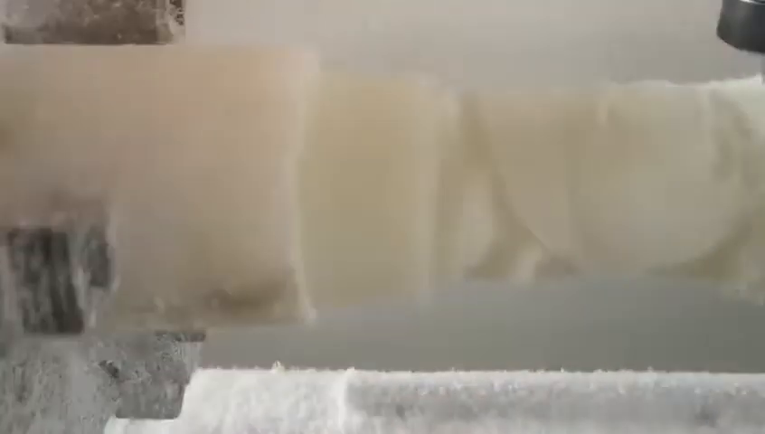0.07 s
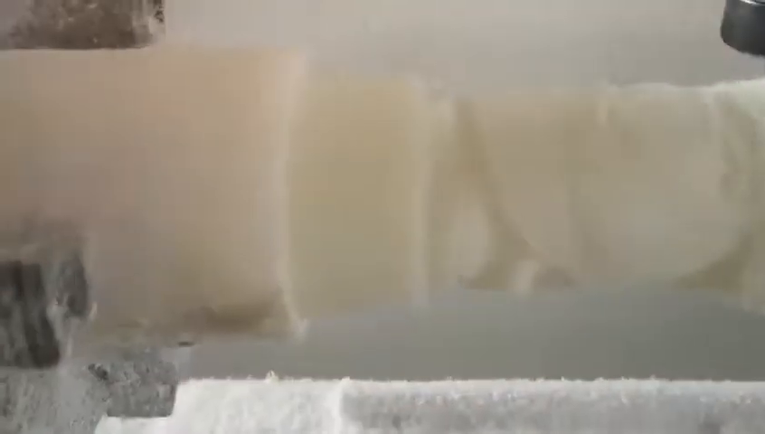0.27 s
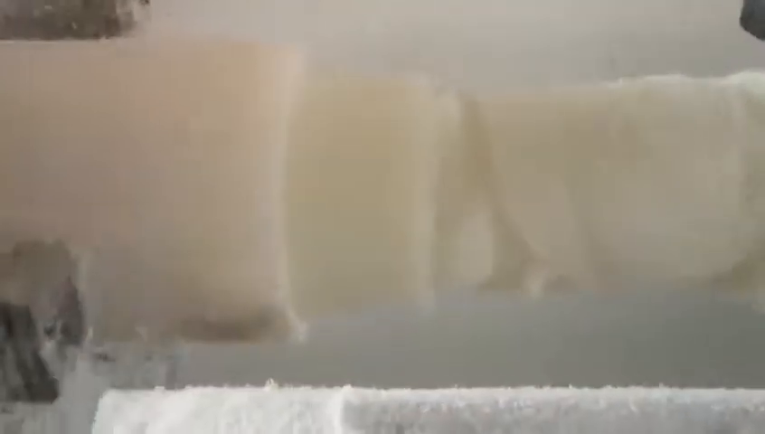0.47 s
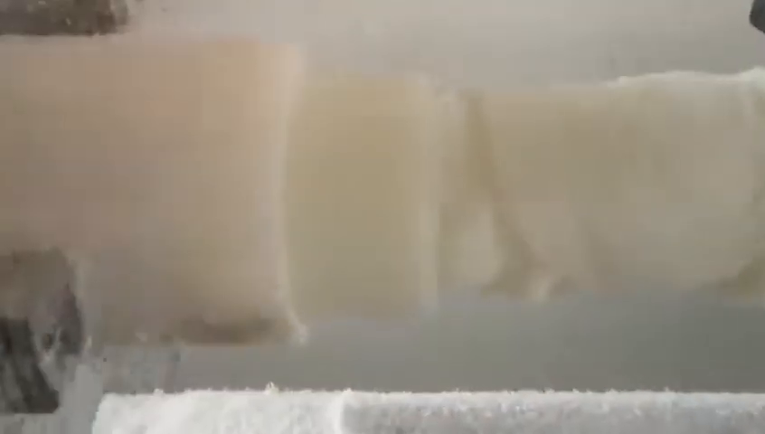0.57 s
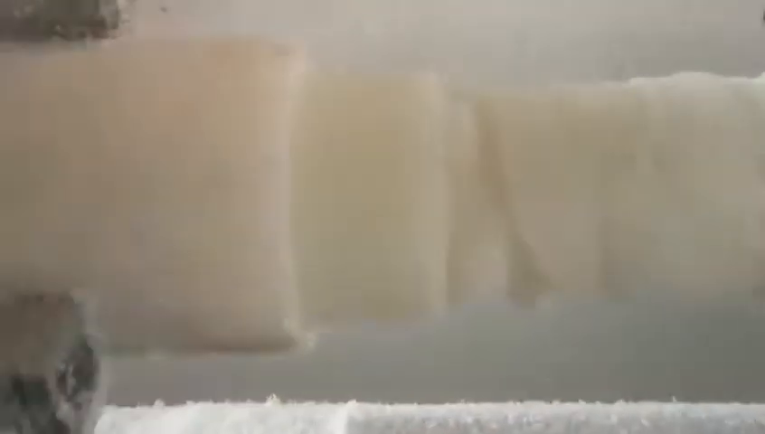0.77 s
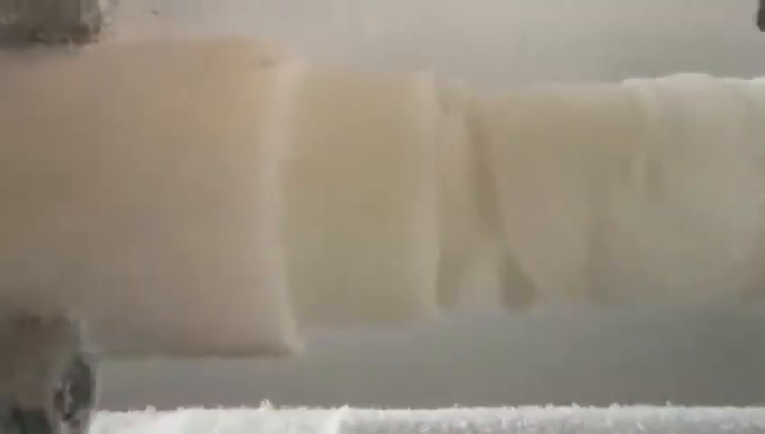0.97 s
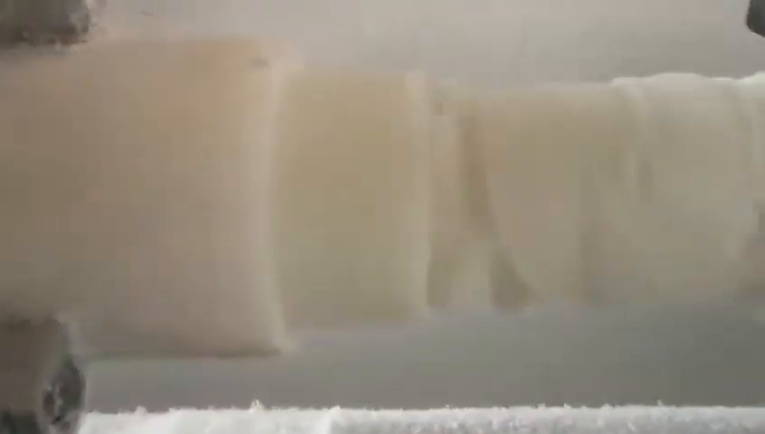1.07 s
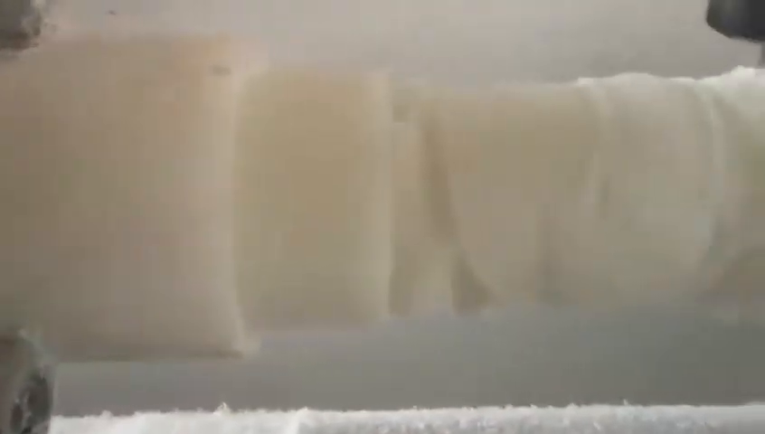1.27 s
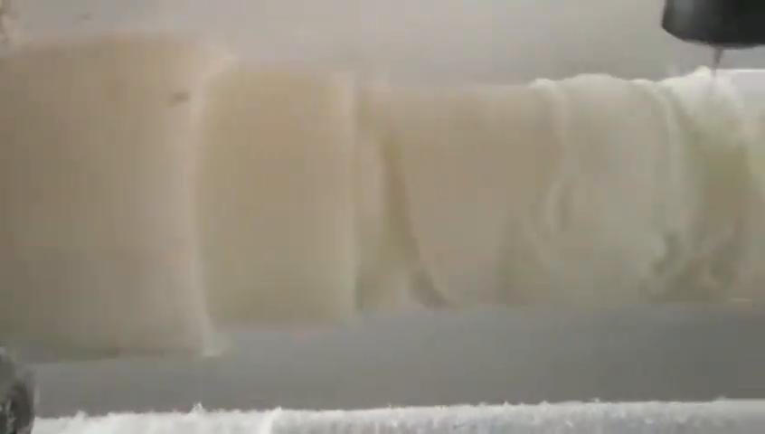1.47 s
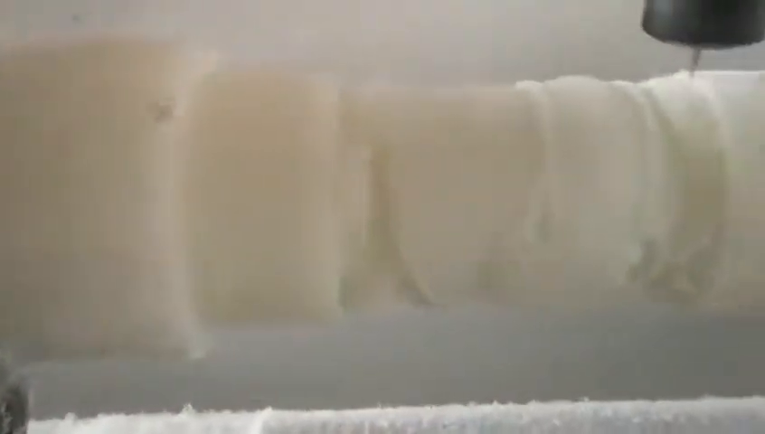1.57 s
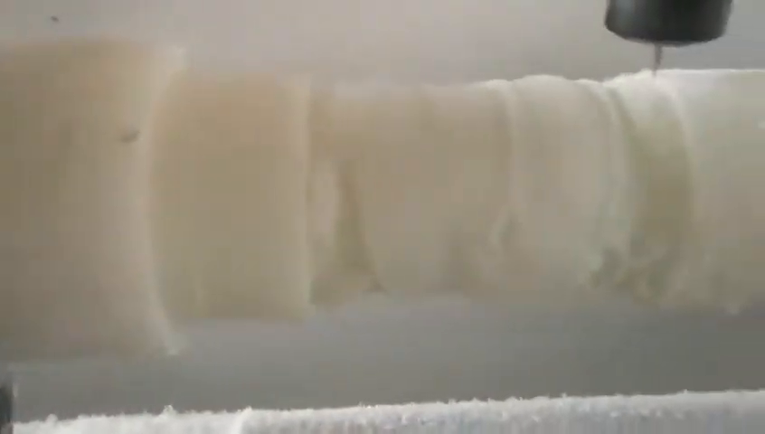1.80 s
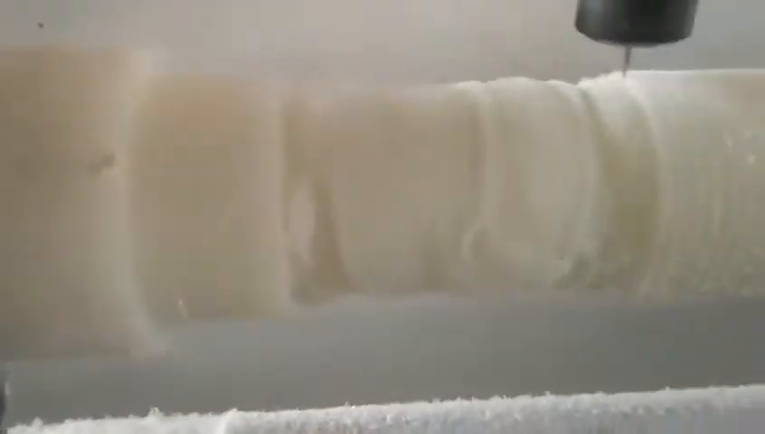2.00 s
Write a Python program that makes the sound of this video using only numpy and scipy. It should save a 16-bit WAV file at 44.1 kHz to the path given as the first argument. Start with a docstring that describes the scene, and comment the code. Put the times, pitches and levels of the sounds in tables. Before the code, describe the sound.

A machine router carves a slowly rotating cylinder, its high, steady whine running over a gritty rasp and the hiss of spraying chips. The cutting swells and eases slightly, while the machine rumbles underneath, heard close inside its housing.

```python
"""A high whine over a gritty rasp and hiss: a router's two-flute bit carves a slowly rotating cylinder.
The spindle turns about 200 times a second, and the whine is made of harmonics of that rate. The cut
excites the workpiece into a rasp, sets the tool ringing and sprays hissing chips; rasp and hiss swell
and ease with the bite. Underneath, the machine frame rumbles and drones."""
import sys
import numpy as np
from scipy import signal
from scipy.fft import rfft, irfft
from scipy.io import wavfile
from scipy.ndimage import uniform_filter1d, map_coordinates

SR = 44100
rng = np.random.default_rng(int(sys.argv[2]) if len(sys.argv) > 2 else 0)


def log_audio(samples):
    """Write samples as a 16-bit WAV file to the path given in sys.argv[1]."""
    # one column per channel
    frames = np.atleast_2d(samples).T
    # limit to full scale, then quantise
    limited = np.clip(frames, -1, 1)
    pcm = np.round(limited * 32767).astype(np.int16)
    wavfile.write(sys.argv[1], SR, pcm)


N = 89919
T = np.arange(N) / SR
FREQS = np.maximum(np.arange(N // 2 + 1) * SR / N, 1)

SPINDLE_HZ, FLUTES = 199.97, 2
RASP_TRIM_DB, BODY_TRIM_DB, HISS_TRIM_DB, RING_TRIM_DB, DRONE_TRIM_DB = -.3, 1, 3, 1, -2.5

# Envelopes of the strong harmonics. Each row: time in seconds, level in dB before the harmonic's gain.
FOURTH_LEVEL = [(0, -29), (.1, -30.3), (.35, -31.5), (.7, -34), (.9, -42), (1.02, -39), (1.17, -42),
                (1.32, -37.5), (1.42, -38.5), (1.5, -32), (1.72, -32), (2.0, -28.5)]
EIGHTH_LEVEL = [(0, -46), (.1, -39), (.2, -39), (.3, -34.5), (.4, -37.5), (.58, -38), (.64, -33),
                (.82, -36), (.94, -35), (.99, -42), (1.07, -34), (1.16, -34), (1.24, -29.5), (1.39, -33.5),
                (1.5, -29.5), (1.63, -37), (1.7, -48), (1.78, -41), (1.84, -40), (1.9, -33), (1.96, -39),
                (2.04, -37.5)]
SIXTH_AND_TENTH_LEVEL = [(0, -41), (.18, -53), (.31, -39), (.46, -43), (.53, -33), (.6, -38), (.67, -29.5),
                         (.76, -30.5), (.84, -37), (.93, -32), (1.0, -38), (1.1, -33), (1.2, -31.5),
                         (1.4, -36), (1.65, -40), (1.74, -50), (1.9, -38), (2.04, -38)]
# Each row: harmonic number, gain in dB, left minus right in dB, left phase lead in radians.
STRONG_HARMONICS = [(4, 0, 2, -.3), (6, -8.5, 0, .6), (8, 0, 0, .7), (10, -2.5, -10, -.8)]
# Each row: harmonic number, level in dB, left minus right in dB, left phase lead in radians.
WEAK_HARMONICS = [(2, -44.5, 5, -.8), (12, -44, -6, 2.4), (14, -49, 1, 1.1), (16, -47, -5, 1.7),
                  (18, -51, -4, 0), (21, -47, -1, 1.2), (23, -42, -5, 2), (25, -49, -3, 3),
                  (27, -42.5, -8, -2), (31, -45, -6, -1.7), (38, -49, 2, 0), (40, -55, 3, -.4),
                  (44, -51, 4, 1.6)]

# Envelopes of the rasp, its lower body, the chips' hiss, the tool's ring and the frame's drone.
# Each row: time in seconds, level in dB before the trim.
RASP_LEVEL = [(0, -27), (.2, -26.5), (.4, -28), (.62, -27.5), (.8, -29), (1.0, -27), (1.1, -28.5),
              (1.2, -29), (1.27, -27.5), (1.5, -28.5), (1.65, -26), (1.74, -27.5), (1.85, -26.5),
              (2.04, -27)]
BODY_LEVEL = [(0, -32.5), (.18, -32.5), (.3, -31), (.48, -35.5), (.52, -32.5), (.6, -30.5), (.78, -31.5),
              (.84, -37), (.88, -30), (1.0, -30), (1.2, -31.5), (1.7, -35), (1.76, -29.5), (1.82, -32.5),
              (2.04, -32.5)]
HISS_LEVEL = [(0, -28.5), (.2, -29), (.45, -28.7), (.65, -29), (.8, -30), (.95, -28.3), (1.1, -29),
              (1.2, -28.2), (1.28, -27.8), (1.45, -28), (1.62, -29), (1.8, -28), (2.04, -28.5)]
RING_LEVEL = [(0, -27.5), (.05, -27), (.08, -27), (.13, -30.5), (.19, -26), (.3, -29.5), (.38, -27),
              (.45, -31), (.52, -23), (.6, -31), (.7, -29), (.73, -30.5), (.78, -35), (.81, -27.5),
              (.87, -26.5), (.9, -35), (.93, -26.5), (1.05, -30), (1.13, -31.5), (1.19, -23), (1.26, -38),
              (1.35, -28), (1.42, -32.5), (1.55, -28.5), (1.69, -30), (1.77, -38), (1.8, -31),
              (2.04, -29.5)]
DRONE_LEVEL = [(0.0, -37), (0.04, -29.5), (0.18, -38), (0.48, -26), (0.58, -32.5), (0.64, -18), (0.7, -40),
               (0.76, -21), (0.8, -37), (0.9, -30), (1.12, -36), (1.8, -37), (1.88, -26.5), (2.04, -36.5)]
# Spectra of the noise sources. Each row: frequency in Hz, relative spectral density in dB.
RASP_SPECTRUM = [(2100, -48), (2380, -13), (2480, -6), (2650, -0.5), (2790, -1.5), (2900, -4), (3350, -7),
                 (3700, -10), (4500, -63.5)]
BODY_SPECTRUM = [(620, -34.5), (800, -12), (1040, -23), (1220, -15), (1380, -16.5), (1580, -7),
                 (1780, -7.5), (1905, -19.5), (2000, -4.5), (2100, -8), (2300, -53)]
HISS_SPECTRUM = [(2800, -50.5), (3500, 0), (3900, 6.5), (4300, 4), (4600, 6.5), (4950, 3), (5150, 2),
                 (5450, 4), (5850, 3.5), (6100, 0.5), (7300, .5), (7600, 4.5), (7870, -3.5), (8000, 3.5),
                 (8200, -20), (8450, -1.5), (8650, -26.5), (8800, -1.5), (9100, -38), (9400, -44.5),
                 (9800, -50.5)]
RING_SPECTRUM = [(1950, -29.5), (2130, -7.5), (2200, 5), (2310, 0.5), (2400, 0), (2520, -27.5), (2700, -60)]
FRAME_SPECTRUM = [(10, -19), (20, -8.5), (26, 6.5), (35, -6.5), (52, 4), (75, -6.5), (105, -1.5),
                  (150, -12.5), (172, -0.5), (195, -6.5), (225, -12), (330, -11), (450, -20.5), (600, -36),
                  (900, -27), (2000, -60)]

# The bit digs in (scrapes) or runs almost free (let-ups).
# Each row: centre in seconds, length in seconds, change of the rasp in dB, change of the hiss in dB.
SCRAPES = [(.085, .045, 2.5, 2), (.205, .035, 2, 1.3), (.305, .05, 0, 1.5), (.53, .045, 3, 1.8),
           (.63, .028, 3.5, 2.5), (.703, .024, 2.5, 4.3), (.89, .034, 1, 3.2), (1.05, .025, 1, 2),
           (1.18, .035, 0, 1.5), (1.24, .025, 2, 1.8), (1.405, .025, 2, 2), (1.802, .03, 1.5, 2),
           (1.858, .035, 1, 2), (1.94, .016, 0, 1.8), (2.003, .026, 1.5, 4.2)]
LET_UPS = [(.04, .03, -2.5, -2), (.145, .03, -3, -1.2), (.355, .022, -4.5, -3), (.59, .025, -1.5, -1.3),
           (.665, .025, 0, -2), (.728, .016, -4.5, -3), (.785, .035, -3, -1), (.842, .022, -2, -2),
           (1.085, .025, -3, -1.5), (1.143, .02, -1, -4), (1.755, .055, -5, -2.3)]
# The bit catches in the workpiece. Each row: centre in seconds, level there in dB, pitch in Hz.
CATCHES = [(0.333, -26.5, 1600), (0.628, -32, 2780), (1.862, -27, 2470), (1.93, -25, 2450)]

# Level difference between the ears. Each row: frequency in Hz, left minus right in dB.
EAR_BALANCE = [(250, 0), (500, 3), (1000, -4), (1800, 0), (2050, -0.5), (2300, -16), (2600, 5.5),
               (2820, -3), (3700, -0.5), (5000, -0.5), (7000, -2), (8300, 4.5)]
# Likeness of the two ears' signals. Each row: frequency in Hz, coherence from 0 to 1.
EAR_COHERENCE = [(200, 1), (330, 1), (600, 0.28), (900, 0.27), (1400, 1), (2000, 0), (3000, 0.85),
                 (4500, .5), (6500, .5), (8500, 0.3)]
# Phase between the ears. Each row: frequency in Hz, left lead in radians, scatter by echoes in radians.
EAR_PHASE = [(200, -3.3, 0.24), (430, -0.7, 0.39), (1000, -0.66, 0.37), (1650, 0.14, 0.05),
             (2010, -0.74, 1.2), (2270, 0.83, 1.5), (3020, 0.77, 0.35), (3550, 1.7, .7), (4650, 3.2, .7),
             (5220, 3.5, .8), (7880, 9, 1.2), (10040, 16, 1.5)]


def spindle_angle(wander=.00048):
    """Angle in radians is the integral of angular speed, which wanders slightly under load."""
    speed_hz = SPINDLE_HZ * (1 + wander * drift(4.1))
    return 2 * np.pi * np.cumsum(speed_hz) / SR


def spindle_whine(angle, strong_waver_db=.5, weak_waver_db=2.4, tremolo_hz=20):
    """Periodic motion radiates harmonics of its rate; each wavers alone, and all share one tremolo."""
    envelopes = (FOURTH_LEVEL, SIXTH_AND_TENTH_LEVEL, EIGHTH_LEVEL, SIXTH_AND_TENTH_LEVEL)
    tones = 0
    for (number, gain_db, pan_db, lead), envelope in zip(STRONG_HARMONICS, envelopes):
        level_db = in_time(envelope) + gain_db + strong_waver_db * drift(6)
        tones += harmonic(angle, number, level_db, pan_db, lead)
    for number, level_db, pan_db, lead in WEAK_HARMONICS:
        tones += harmonic(angle, number, level_db + weak_waver_db * drift(6), pan_db, lead)
    tremolo = 1 + .14 * np.sin(2 * np.pi * tremolo_hz * T + drift(4.1))
    return tones * tremolo


def harmonic(angle, number, level_db, pan_db, lead):
    """A sinusoid phase-locked to the rotation, placed by level and phase differences between the ears."""
    half = np.array([[.5], [-.5]])
    phase = number * angle + rng.uniform(0, 2 * np.pi) + half * lead
    return np.sqrt(2) * from_db(level_db + half * pan_db) * np.sin(phase)


def workpiece_rasp(angle, bite_db, grit):
    """Forced vibration: the cut drives the workpiece's resonances, pulsing with each flute and turn."""
    pulsing = 1 + .048 * np.sin(FLUTES * angle) + .02 * np.sin(angle)
    grit_db = 1.05 * grit
    rasp_db = in_time(RASP_LEVEL) + RASP_TRIM_DB + bite_db + grit_db
    body_db = in_time(BODY_LEVEL) + BODY_TRIM_DB + .44 * bite_db + grit_db
    rasp = from_db(rasp_db) * flicker(stereo_noise(RASP_SPECTRUM), depth_db=3.2)
    body = from_db(body_db) * flicker(stereo_noise(BODY_SPECTRUM), depth_db=3.2)
    return pulsing * (rasp + body)


def chip_hiss(bite_db, grit):
    """Many independent chips add up to broadband noise, whose colour flickers and keeps shifting."""
    level_db = in_time(HISS_LEVEL) + HISS_TRIM_DB + bite_db + .76 * grit
    spray = flicker(stereo_noise(HISS_SPECTRUM), depth_db=3.8)
    return from_db(level_db) * flicker(spray, depth_db=5.5, band_hz=65, per_s=8, size=2048)


def bite_changes(rows):
    """A deeper bite excites more sound: flat-topped swells or dips in dB, for the rasp and the hiss."""
    return sum(np.outer([rasp_db, hiss_db], np.exp(-(2 * (T - centre) / length) ** 4))
               for centre, length, rasp_db, hiss_db in rows)


def tool_chatter(burst_db=3, average_s=.04):
    """The tool resonates near 2.3 kHz in quick uneven bursts; its slower level follows the load."""
    ringing = stereo_noise(RING_SPECTRUM) * from_db(burst_db * drift(90))
    slow_power = uniform_filter1d(np.mean(ringing ** 2, axis=0), size=int(average_s * SR))
    return from_db(in_time(RING_LEVEL) + RING_TRIM_DB) * ringing / np.sqrt(slow_power)


def bit_catches(sigma_s=.009):
    """Each catch briefly excites a broad resonance of the workpiece, under a Gaussian envelope."""
    knocks = 0
    for centre, level_db, hz in CATCHES:
        envelope = np.exp(-.5 * ((T - centre) / sigma_s) ** 2)
        knocks += from_db(level_db) * envelope * resonant_noise(hz, width_hz=600)
    return knocks


def frame_rumble(drone_hz=136.6, rumble_db=-33.5):
    """Structural vibration: the frame rumbles and one lightly damped mode drones; both throb together."""
    level_db = in_time(DRONE_LEVEL)
    mode = signal.hilbert(resonant_noise(drone_hz, width_hz=20))
    drone = rms_one(mode.real / (np.abs(mode) + .1) ** .6)  # partly evens out the random envelope
    throb_db = .15 * (level_db - level_db.mean())
    rumble = flicker(stereo_noise(FRAME_SPECTRUM), depth_db=2)
    return from_db(rumble_db + throb_db) * rumble + from_db(level_db + DRONE_TRIM_DB) * drone


def stereo_noise(spectrum, mono_below_hz=275, ripple_from_hz=2600):
    """Partly coherent noise at two ears in the reflecting housing; long waves reach both alike. Rms 1."""
    mid, side = rfft(rng.standard_normal((2, N)))
    sign = np.array([[1], [-1]])
    apart = 1 / (1 + (mono_below_hz / FREQS) ** 6)
    coherence = 1 - apart * (1 - np.clip(at_hz(EAR_COHERENCE), 0, 1))
    pair = np.sqrt(1 + coherence) * mid + sign * np.sqrt(1 - coherence) * side
    lead = at_hz(EAR_PHASE) + at_hz(EAR_PHASE, column=2) * housing_ripple()
    phase_shift = np.exp(.5j * sign * apart * lead)
    ripple_db = 1.5 * np.array([housing_ripple(), housing_ripple()]) / (1 + (ripple_from_hz / FREQS) ** 2)
    balance_db = sign * apart * at_hz(EAR_BALANCE) / 2
    return rms_one(irfft(pair * phase_shift * from_db(at_hz(spectrum) + ripple_db + balance_db), N))


def housing_ripple(decay_s=.0036):
    """Interference of short echoes in the housing leaves a random ripple over frequency; rms 1."""
    echoes = rng.standard_normal(N) * T * np.exp(-T / decay_s)
    return rms_one(rfft(echoes).real)


def flicker(sound, depth_db, band_hz=170, per_s=18, size=512):
    """Random amplitude modulation: each narrow band swells and fades on its own; rms 1."""
    window = dict(nperseg=size, noverlap=size - size // 4)
    hz, seconds, bands = signal.stft(sound, SR, **window)
    chance = rng.standard_normal((int(SR / 2 / band_hz) + 2, size))
    grid = np.meshgrid(hz / band_hz, 2 * per_s * seconds, indexing="ij")
    swing = np.minimum(map_coordinates(chance, grid, order=1), .55)  # swells are capped, fades are not
    _, modulated = signal.istft(bands * from_db(depth_db * swing), SR, **window)
    return rms_one(modulated[:, :N])


def resonant_noise(hz, width_hz):
    """A resonance selects from white noise the band around its natural frequency; rms 1."""
    response = 1 / (1 + (2 * (FREQS - hz) / width_hz) ** 2)
    return rms_one(irfft(rfft(rng.standard_normal(N)) * response, N))


def drift(corner_hz):
    """Low-pass filtered noise gives a smooth random fluctuation; mean 0, rms 1."""
    slow = irfft(rfft(rng.standard_normal(N)) / (1 + (FREQS / corner_hz) ** 2), N)
    return rms_one(slow - slow.mean())


def in_time(rows):
    """Linear interpolation of an envelope at every sample."""
    return np.interp(T, *np.transpose(rows))


def at_hz(rows, column=1):
    """Interpolation of one column over log frequency, at every bin."""
    columns = np.transpose(rows)
    return np.interp(np.log(FREQS), np.log(columns[0]), columns[column])


def from_db(db):
    """Decibels to amplitude ratio."""
    return 10 ** (np.asarray(db) / 20)


def rms_one(x):
    """Normalisation to unit rms."""
    return x / np.sqrt(np.mean(x ** 2) + 1e-20)


def scene():
    """Superposition: the pressures from spindle, cut and frame add."""
    angle = spindle_angle()
    whine = spindle_whine(angle)
    grit = drift(77)  # chips breaking off roughen rasp and hiss together
    rasp_bite_db, hiss_bite_db = bite_changes(SCRAPES) + bite_changes(LET_UPS)
    cut = workpiece_rasp(angle, rasp_bite_db, grit) + chip_hiss(hiss_bite_db, grit)
    return whine + cut + tool_chatter() + bit_catches() + frame_rumble()


def record(dry):
    """A steep zero-phase low-pass filter removes the treble above 10.2 kHz."""
    return signal.sosfiltfilt(signal.cheby2(16, 50, 10200, fs=SR, output="sos"), dry)


dry = scene()
out = record(dry)
log_audio(out)
```